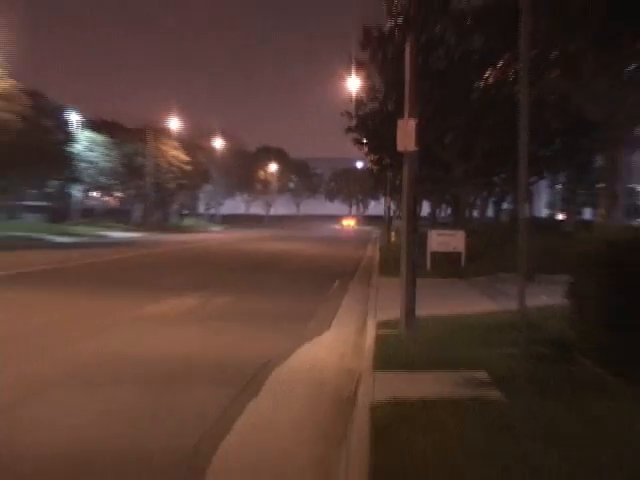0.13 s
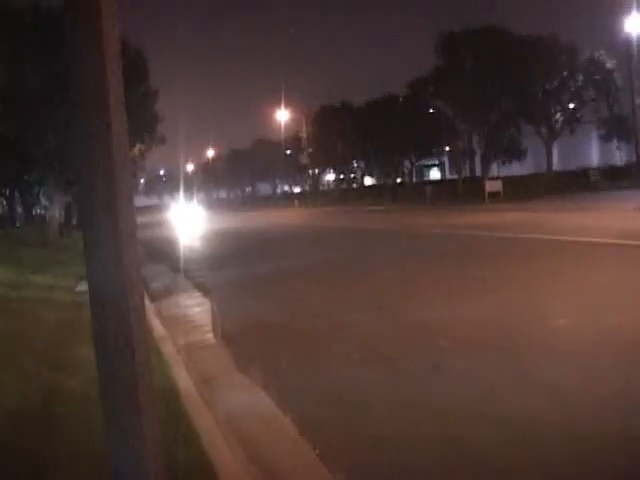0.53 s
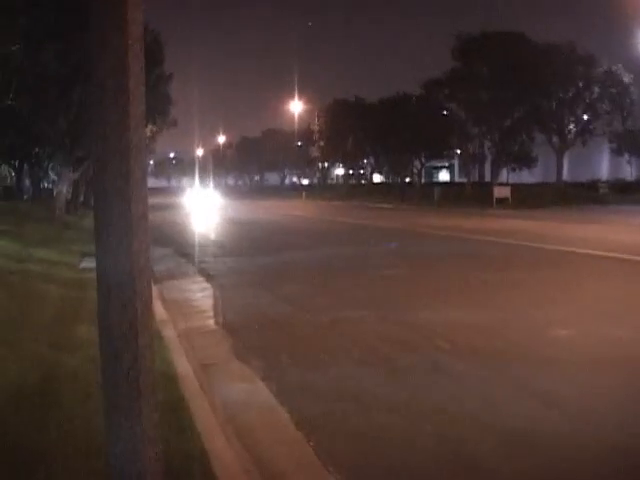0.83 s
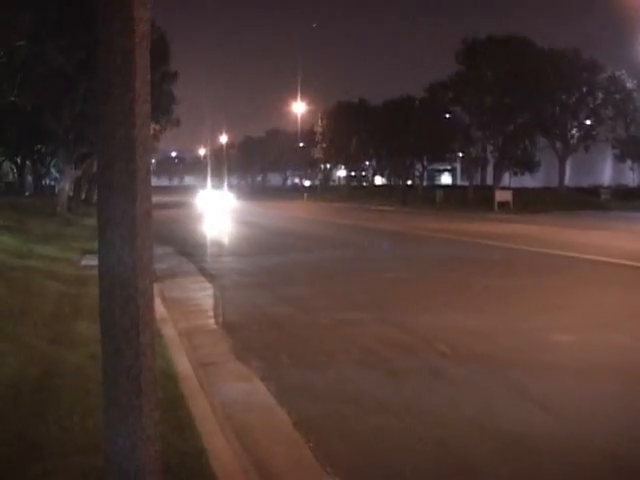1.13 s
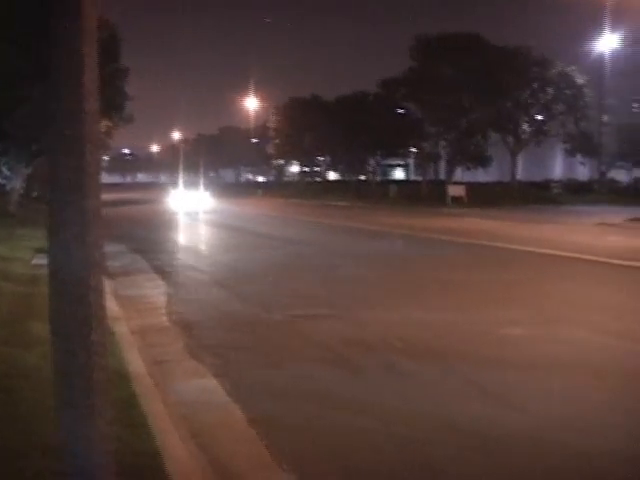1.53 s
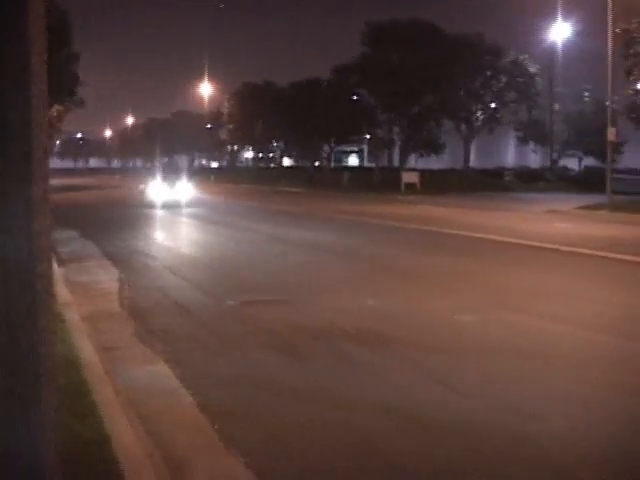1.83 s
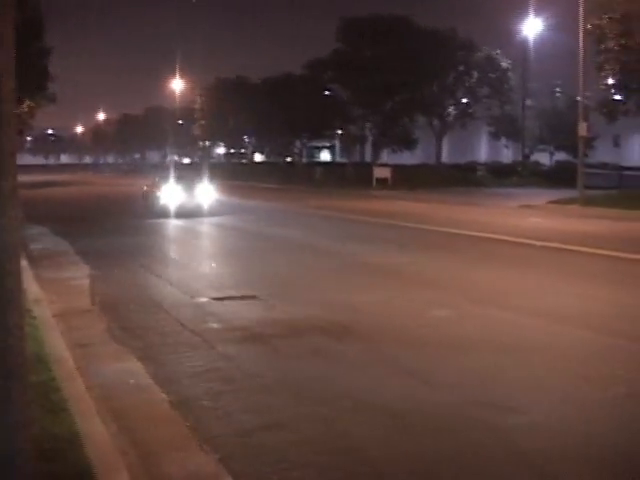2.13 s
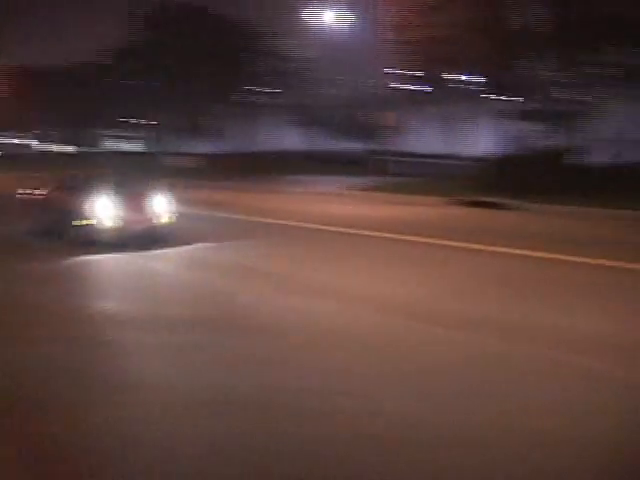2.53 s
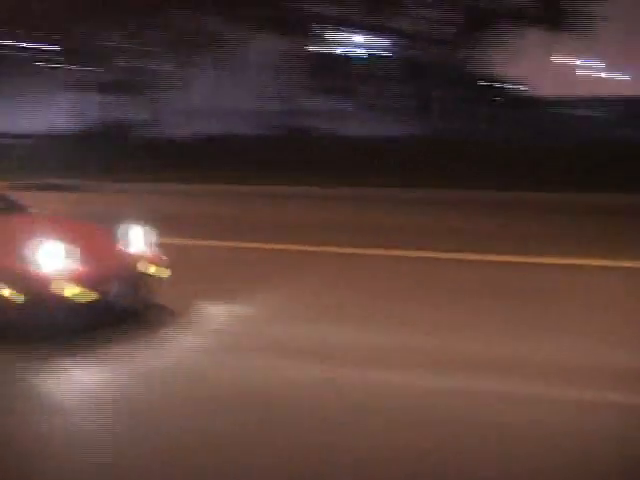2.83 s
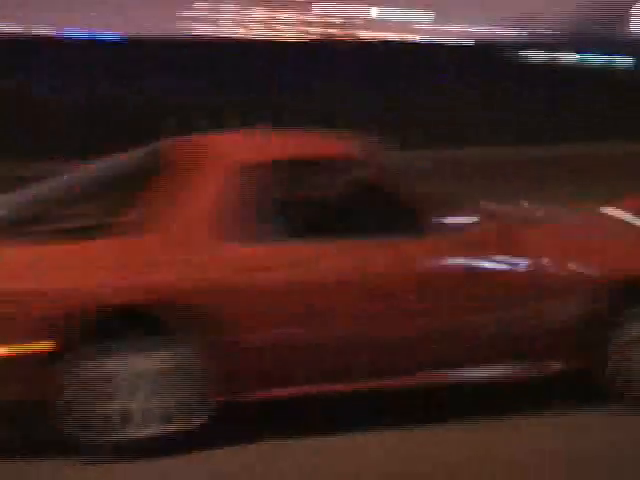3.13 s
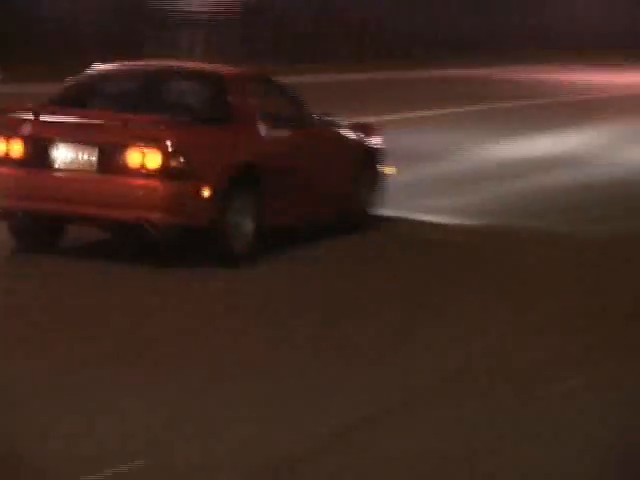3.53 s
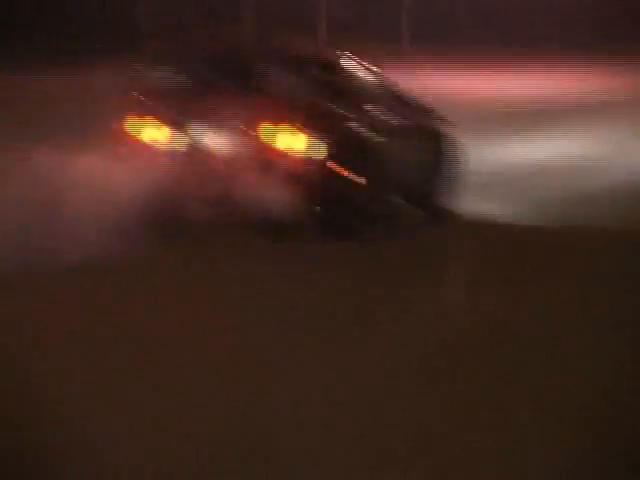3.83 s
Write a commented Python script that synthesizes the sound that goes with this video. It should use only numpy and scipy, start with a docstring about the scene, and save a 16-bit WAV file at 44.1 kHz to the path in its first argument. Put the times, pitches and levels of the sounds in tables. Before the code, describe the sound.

Sports car engine approaching loudly, throttle lifted, then popping and backfiring hard as it passes.

```python
"""A roadside at night: far traffic on a quiet street, then an abrupt cut to a sports car nearing the microphone.
The engine is a stack of shaft orders with gas rasp; tyres are coloured noise with wavering tones.
The driver lifts off just before passing: the note sinks and unburnt fuel pops as ringing tailpipe modes.
Two hard backfires, held bursts of noise, overload the microphone and echo along the street."""
import sys
import numpy as np
from scipy import signal
from scipy.fft import rfft, irfft, next_fast_len
from scipy.io import wavfile
from scipy.ndimage import uniform_filter1d, map_coordinates

SR = 44100
rng = np.random.default_rng(int(sys.argv[2]) if len(sys.argv) > 2 else 0)


def transcribe(signal):
    """Save signal, clipped to [-1, 1], as a 16-bit WAV file at the path in sys.argv[1]."""
    frames = np.atleast_2d(signal).T
    limited = np.clip(frames, -1, 1)
    pcm = np.round(limited * 32767).astype(np.int16)
    wavfile.write(sys.argv[1], SR, pcm)


N = 176400
CUT_S, LIFT_S = 0.594, 2.558  # the cut from traffic to car; the throttle closes


def amp(db):
    """Decibels to gain."""
    return 10 ** (np.asarray(db) / 20)


def unit(x):
    """Scale to rms 1."""
    return x / np.sqrt(np.mean(x ** 2) + 1e-20)


def clock():
    """Time of each sample in seconds."""
    return np.arange(N) / SR


def curve(rows):
    """(s, value) points joined by straight lines."""
    return np.interp(clock(), *np.transpose(rows))


def wobble(rate):
    """A smooth random curve, rate knots a second."""
    return map_coordinates(rng.standard_normal(int(N * rate / SR) + 4), [clock() * rate])


def filtered(x, response):
    """x times a response of frequency."""
    m = next_fast_len(N + SR)
    return irfft(rfft(x, m) * response(np.fft.rfftfreq(m, 1 / SR)), m)[:N]


def noise(colour):
    """Noise of rms 1 with a (Hz, dB) spectrum."""
    hz, db = np.transpose(colour)
    response = lambda f: amp(np.interp(np.log(f + 1), np.log(hz), db))
    return unit(filtered(rng.standard_normal(N), response))


def decay(age, t60):
    """Silence until age 0, then an exponential fall of 60 dB in t60 seconds."""
    return (age >= 0) * amp(-60 * np.maximum(age, 0) / t60)


def bell(offset, width):
    """A smooth bump of height 1, down to 1/e at width either side."""
    return np.exp(-(offset / width) ** 2)


def puffs(colour, angle, pulsing):
    """Gas noise of rms 1 that comes in one puff per turn of the angle."""
    return unit(noise(colour) * np.exp(pulsing * np.cos(angle)))


# spectrum of the far road: pitch_hz, level_db
TRAFFIC_COLOUR = [(40, -38), (140, -8.5), (300, -11), (520, -9.5), (950, 1), (1860, -12), (3650, -28.5),
                  (7200, -40.5), (10000, -39), (11000, -30), (12100, -45), (13300, -30), (15500, -46)]
TRAFFIC_DB = -42
FAR_ENGINE_HZ, FAR_ENGINE_DB = 239, -55


def traffic():
    """Far road noise and one humming engine, both gently unsteady in level."""
    hum = np.sqrt(2) * np.sin(2 * np.pi * FAR_ENGINE_HZ * clock() + 0.2 * wobble(10))
    road = amp(TRAFFIC_DB + 0.74 * wobble(22.3)) * noise(TRAFFIC_COLOUR)
    return road + amp(FAR_ENGINE_DB + wobble(6.2)) * hum


# engine speed as heard at the microphone: time_s, turns_per_s
SHAFT = [(.594, 114.5), (1, 118.4), (1.4, 122.4), (2, 128.1), (2.3, 130.7), (2.59, 132.9), (2.62, 125.5),
         (2.68, 123.6), (2.95, 126), (3.1, 122), (3.26, 120), (3.4, 111.5), (3.6, 109), (4, 105.5)]
JITTER = 0.0012  # unsteadiness of speed (share)


def shaft_angle():
    """Angle of the slightly unsteady engine shaft, the running sum of its speed."""
    return 2 * np.pi * np.cumsum(curve(SHAFT) * (1 + JITTER * wobble(29.63))) / SR


# reference level of the engine under load: time_s, level_db
DRONE = [(.6, -30), (1, -27), (1.45, -23), (1.9, -19.5), (2.2, -16), (2.4, -13.5), (2.55, -12.5)]
# first twelve multiples of shaft speed, against the drone, at three distances: level_db
ORDERS_FAR = [-30, 2.3, -12, -4.5, -13, -11, -18, -10, -9, -1, -16, -14]
ORDERS_MID = [-29, -.6, -20, -13, -8, -16, -10, -11, -9, -3.5, -16, -15]
ORDERS_NEAR = [-27, 1.4, -22, -8, -7.5, -9, -24, -12.5, -16, -16, -27, -24]
# when the far, halfway and near levels hold: time_s
ORDER_TIMES = [0.9, 1.53, 2.35]
# bands of orders that swell and fade: time_s, half_length_s, pitch_hz, half_width_hz, lift_db
SWELLS = [(1.92, .18, 4060, 130, 15), (1.75, .25, 3770, 70, 13), (1.45, .18, 4080, 110, 13),
          (1.8, .35, 2270, 70, 11), (2.22, .22, 2090, 60, 13), (2.17, .3, 2850, 60, 11),
          (2.54, .09, 1280, 160, 7), (2.61, .1, 640, 70, 5.5), (1.7, .2, 2640, 60, 8)]
# spectrum of the gas noise at each firing: pitch_hz, level_db
RASP_COLOUR = [(150, -28), (300, -17), (600, 3), (1150, -6.5), (1600, -6), (2300, 7), (3300, -37),
               (4100, -20), (7000, -22), (15000, -16.5)]
RASP_DB, RASP_PULSING = -13, 0.44  # against the drone; how sharply it pulses
OVERTONE_DB = -0.5  # trim of orders 1 and 3 to 12
UPPER_DB, UPPER_DB_PER_OCTAVE, UPPER_NEAR_DB = -19, -9.5, -3  # above the twelfth: level, slope, change near
FLUTTER_DB, FLUTTER_RATE = 1.8, 18  # unsteadiness of overtones (dB, knots a second)
FIRING_FALL_S, OVERTONE_FALL_S = 0.017, 0.017  # time constants of the fall after the lift
RINGING_ORDER, RINGING_FALL_S = 5, 0.1  # the order that the tailpipe holds after the lift


def drone(angle, count=40):
    """The engine under load: two firings a turn, overtones that flutter with the ground reflection, and rasp."""
    t = clock()
    speed = curve(SHAFT)
    coast = np.maximum(t - LIFT_S, 0)
    fading = np.exp(-coast / OVERTONE_FALL_S)

    def overtone_db(k):
        swell = sum(lift * bell(t - s, length) * bell(k * speed - hz, width)
                    for s, length, hz, width, lift in SWELLS)
        return swell + FLUTTER_DB * wobble(FLUTTER_RATE)

    firing, overtones = np.zeros(N), np.zeros(N)
    for k, levels in enumerate(zip(ORDERS_FAR, ORDERS_MID, ORDERS_NEAR), 1):
        partial = amp(np.interp(t, ORDER_TIMES, levels)) * np.sin(k * angle + rng.uniform(0, 2 * np.pi))
        if k == 2:
            firing += amp(0.45 * wobble(16)) * partial
        else:
            fall = RINGING_FALL_S if k == RINGING_ORDER else OVERTONE_FALL_S
            overtones += amp(OVERTONE_DB + overtone_db(k)) * partial * np.exp(-coast / fall)

    top = len(ORDERS_FAR)
    for k in range(top + 1, count):
        db = UPPER_DB + UPPER_DB_PER_OCTAVE * np.log2(k / top) + overtone_db(k)
        db += UPPER_NEAR_DB * np.interp(t, ORDER_TIMES, [0, 0, 1])
        phase = k * angle + rng.uniform(0, 2 * np.pi) + 0.5 * wobble(25)
        overtones += amp(db) * np.sin(phase) * fading

    rasp = amp(RASP_DB) * puffs(RASP_COLOUR, 2 * angle, RASP_PULSING) * fading
    tones = np.sqrt(2) * (firing * np.exp(-coast / FIRING_FALL_S) + overtones)
    return amp(curve(DRONE)) * (tones + rasp)


# level of the tyre roar at the microphone: time_s, level_db
ROAR = [(.6, -31.5), (1.1, -27), (1.6, -25.5), (2, -21), (2.3, -19.5), (2.55, -15.5), (2.68, -15.5),
        (2.9, -12.5), (3.06, -10.5), (3.28, -15), (3.45, -14), (3.65, -17.5), (3.85, -20), (4, -21)]
# level of the treble hiss: time_s, level_db
HISS = [(.6, -46.5), (1.1, -40.5), (1.6, -34.5), (2.1, -35.5), (2.5, -32.5), (2.72, -30), (2.92, -25.5),
        (3.07, -21), (3.28, -20), (3.45, -25), (3.65, -30), (4, -39)]
# roar spectra, car facing the microphone and then tail on: pitch_hz, level_db
ROAR_FRONT = [(35, -74), (60, -58), (91, -28), (123, -20), (194, -9), (301, -1.5), (353, -3.5), (382, -4),
              (414, -2), (505, -0.5), (655, -3.5), (1030, 3), (3160, -14.5), (3420, -21.5), (4700, -28.5),
              (7000, -55), (9100, -44), (15400, -120)]
ROAR_REAR = [(35, -69), (60, -47), (97, -15), (183, -12.5), (210, -16), (247, -8), (320, -2), (390, -9),
             (431, 4), (486, -4), (604, -4.5), (1140, -0.5), (1420, -4.5), (6210, -31), (7000, -50),
             (9100, -64), (15400, -120)]
# hiss spectra, on the approach and then close by: pitch_hz, level_db
HISS_FRONT = [(1500, -29), (2700, 8), (3400, 1.5), (4100, 10), (5300, -1), (6000, 3.5), (7000, -9),
              (8000, -5), (8600, -11.5), (10000, -3), (10500, -10), (10900, 0.5), (11600, -11),
              (12100, -18), (12700, -9), (13300, -2), (13700, -5), (14300, -6), (15800, -18)]
HISS_CLOSE = [(1500, -5.5), (2700, 9), (3500, 0.5), (4500, 6), (5300, -3), (6100, 1), (7300, -8.5),
              (9000, -9.5), (11000, -6), (12200, -10), (13300, -6), (15800, -12)]
# the car begins and ends turning its tail to the microphone: time_s
TURN_S = [2.98, 3.47]


def after_lift():
    """Share that rises from 0 at the lift to 1 as the car begins to turn its tail."""
    return np.interp(clock(), [LIFT_S, TURN_S[0]], [0, 1])


def tyres():
    """Road roar changes colour from front to rear; hiss peaks alongside."""
    rear = np.interp(clock(), TURN_S, [0, 1])
    close = after_lift()
    # square roots keep the power even through each crossfade
    roar = np.sqrt(1 - rear) * noise(ROAR_FRONT) + np.sqrt(rear) * noise(ROAR_REAR)
    hiss = np.sqrt(1 - close) * noise(HISS_FRONT) + np.sqrt(close) * noise(HISS_CLOSE)
    return amp(curve(ROAR) + 0.8 * wobble(45)) * roar + amp(curve(HISS) + 0.9 * wobble(60)) * hiss


# thin hissing tones during the approach: pitch_hz, peak_level_db
TREBLE_TONES = [(10900, -58), (13300, -57)]
TREBLE_FADE_S = 2.0  # the fade starts here and ends at the lift


def treble_tones():
    """Two faint tones high above the engine, made fuzzy by fast phase wander."""
    t = clock()
    tones = sum(amp(db) * np.sin(2 * np.pi * hz * t + 1.3 * wobble(250)) for hz, db in TREBLE_TONES)
    return tones * np.interp(t, [TREBLE_FADE_S, LIFT_S], [1, 0])


# spectrum of air on the microphone: pitch_hz, level_db
RUMBLE_COLOUR = [(15, -2), (30, -13), (60, -4), (120, -14), (400, -70)]
RUMBLE_DB = -74


def air():
    """Very faint low rumble of air on the microphone, unsteady in level."""
    return amp(RUMBLE_DB + 2 * wobble(4)) * noise(RUMBLE_COLOUR)


# level of the engine on a closed throttle: time_s, level_db
OVERRUN = [(2.5, -37), (2.66, -37), (3, -30.5), (3.25, -24), (3.4, -27), (3.65, -33), (4, -36)]
# its low orders, against that level: shaft_multiple, level_db
OVERRUN_ORDERS = [(1, -3.5), (2, -3.5), (3, -3), (4, -4), (5, -7.5)]
# spectrum of the exhaust puffs, one a turn: pitch_hz, level_db
CHUFF_COLOUR = [(120, -43), (280, 1), (1500, 0), (15000, -28)]
CHUFF_DB, CHUFF_PULSING = 1, 1.1  # against the closed-throttle level; how sharply they pulse
# level of the order that meets the tailpipe's resonance: time_s, level_db
PIPE_SING = [(3.3, -45), (3.45, -34), (3.69, -29.5), (3.73, -28), (3.79, -22), (3.87, -45), (4, -16)]
PIPE_ORDER, OVERRUN_RISE_S = 4, 0.017


def overrun(angle):
    """The coasting engine burbles on its low orders, chuffs once a turn and sings in the tailpipe."""
    burble = sum(amp(db + 2.9 * wobble(21.77)) * np.sin(k * angle + 0.18 * k * wobble(25))
                 for k, db in OVERRUN_ORDERS)
    chuff = amp(CHUFF_DB) * puffs(CHUFF_COLOUR, angle, CHUFF_PULSING)
    sing = amp(curve(PIPE_SING)) * np.sin(PIPE_ORDER * angle + 0.5 * wobble(25))
    engine = amp(curve(OVERRUN)) * (np.sqrt(2) * burble + chuff) + np.sqrt(2) * sing
    return engine * np.clip((clock() - LIFT_S) / OVERRUN_RISE_S, 0, 1)


# Doppler shift as the car goes by: time_s, pitch_ratio
DOPPLER = [(2.85, 1.06), (3.05, 1.035), (3.16, .99), (3.27, .96), (3.5, .935)]


def passing(hz):
    """Phase of a tone on the car, lowered by the Doppler shift as it goes by."""
    return 2 * np.pi * hz * np.cumsum(curve(DOPPLER)) / SR


# tones of the tyre tread before the Doppler shift: pitch_hz
TREAD_HZ = [891, 1164, 1318, 1435, 1574, 2063, 3020]
TREAD_DB, TREAD_DB_PER_OCTAVE = -21, -11  # lowest tone against the roar; slope above it
# the strongest tone in the roar, as heard: time_s, pitch_hz
HOWL = [(2.8, 1040), (3.02, 1050), (3.09, 950), (3.2, 935), (3.27, 1020), (3.42, 1120), (3.53, 1160),
        (3.65, 1030), (3.8, 1020), (3.92, 945)]
HOWL_DB = -11  # against the roar


def tread():
    """Wavering tyre tones emerge from the roar off load; the strongest dips in pitch alongside."""
    tones = np.zeros(N)
    for hz in TREAD_HZ:
        db = TREAD_DB + TREAD_DB_PER_OCTAVE * np.log2(hz / TREAD_HZ[0]) + 3.6 * wobble(12)
        tones += amp(db) * np.sin(passing(hz) + 1.2 * wobble(35))
    howl_phase = 2 * np.pi * np.cumsum(curve(HOWL)) / SR + 0.8 * wobble(70)
    howl = amp(HOWL_DB + 2 * wobble(40)) * np.sin(howl_phase)
    return amp(curve(ROAR)) * np.sqrt(2) * (tones + howl) * after_lift()


WHISTLE_HZ, WHISTLE_DB = 13000, -36.5  # before the Doppler shift; peak level
WHISTLE_S, WHISTLE_WIDTH_S = 3.15, 0.17  # centre; half length


def whistle():
    """A thin, fuzzy whistle swells and fades as the car is alongside the microphone."""
    tone = np.sin(passing(WHISTLE_HZ) + 0.8 * wobble(300))
    return amp(WHISTLE_DB) * tone * bell(clock() - WHISTLE_S, WHISTLE_WIDTH_S)


# soft pops in the exhaust: start_s, level_db, pitch_ratio
POPS = [(3.0211, -0.5, 0.86), (3.0443, 3, .92), (3.049, -2, 0.95), (3.310, -1, 1), (3.557, -4.5, 0.97),
        (3.578, -2, 0.8), (3.762, -2, 0.948), (3.7687, 6.5, .92), (3.7778, 0, .94), (3.9785, -2.5, 1.01),
        (3.9849, 2.5, 1.12), (3.994, -0.5, 0.93)]
# tailpipe modes at pitch ratio 1: pitch_hz, level_db, t60_s
PIPE = [(354, -11.5, 0.06), (443, -13.5, .06), (537, 3, 0.027), (630, -10.5, 0.017), (1122, -8, 0.024)]
PIPE_SCATTER = 0.013  # spread of the modes from pop to pop (share)
# spectrum of the spat gas: pitch_hz, level_db
SPIT_COLOUR = [(200, 3.5), (1500, 0), (4000, -6.5), (7000, -20), (12000, -16.5), (16000, -20)]
SPIT_DB, SPIT_T60, POP_LOW_HZ = -14.5, 0.036, 222  # against the pop; s; bass cut of the pops


def pops():
    """Small ignitions ring the tailpipe, each at its own pitch, and spit gas."""
    out, gas = np.zeros(N), noise(SPIT_COLOUR)
    for s, db, pitch in POPS:
        age = clock() - s
        ring = np.zeros(N)
        for hz, level, t60 in PIPE:
            mode_hz = hz * pitch * rng.normal(1, PIPE_SCATTER)
            ring += amp(level) * decay(age, t60) * np.sin(2 * np.pi * mode_hz * age)
        spit = amp(SPIT_DB) * gas * decay(age, SPIT_T60)
        out += amp(db) * (spit - ring)
    return signal.sosfilt(signal.butter(2, POP_LOW_HZ, 'high', fs=SR, output='sos'), out)


# spectrum of the echo: pitch_hz, level_db
STREET_COLOUR = [(100, -19), (450, -6), (1000, -1.5), (3000, -7), (12000, -3)]
STREET_DB, STREET_T60, STREET_DELAY_S = -14.5, 0.2, 0.012


def street(x):
    """Diffuse echo from trees and house fronts: a decaying noise tail convolved with the sound."""
    tail = noise(STREET_COLOUR) * decay(clock() - STREET_DELAY_S, STREET_T60)
    return amp(STREET_DB) * signal.fftconvolve(x, tail / np.linalg.norm(tail))[:N]


# sharp backfires: start_s, level_db, hold_s, pressure_surge (0-1)
BANGS = [(3.062, -6.5, .002, 0), (3.3137, 11, 0.0074, 1), (3.438, -15, .002, 0.07),
         (3.5613, 7.5, 0.0021, 0.78), (3.703, -19, 0.00092, 0.08)]
# spectrum of the bursts: pitch_hz, level_db
BANG_COLOUR = [(60, 3), (200, -6), (500, 3.5), (1200, -5), (3000, -3), (6000, -15.5), (11000, -22),
               (16000, -28)]
BANG_ATTACK_S, BANG_T60 = 0.0051, 0.046


def bangs():
    """Explosions at the pipe's mouth: a burst that holds briefly and dies."""
    t, envelope = clock(), np.zeros(N)
    for s, db, hold, _ in BANGS:
        attack = np.clip((t - s) / BANG_ATTACK_S, 0, 1)
        # the fall may begin during the attack when the hold is short
        envelope += amp(db) * attack * decay(np.maximum(t - s - hold, 0), BANG_T60)
    return envelope * noise(BANG_COLOUR)


SUCTION, SUCTION_S, SUCTION_DELAY_S = 0.52, 0.014, 0.012  # size, half width, lag
REBOUND, REBOUND_S, REBOUND_DELAY_S = 0.076, 0.036, 0.061  # the slower swing back


def surge():
    """The suction wave that follows each bang, by its pressure surge, and the rebound."""
    t, pressure = clock(), np.zeros(N)
    for s, _, _, size in BANGS:
        suction = SUCTION * bell(t - s - SUCTION_DELAY_S, SUCTION_S)
        rebound = REBOUND * bell(t - s - REBOUND_DELAY_S, REBOUND_S)
        pressure += size * (rebound - suction)
    return pressure


# bright ticks: start_s, level_db
TICKS = [(3.3745, -20), (3.6435, -29), (3.849, -27), (3.8586, -27), (3.9055, -30)]
# their spectrum: pitch_hz, level_db
TICK_COLOUR = [(5000, -25), (12000, 0), (16000, -9)]
TICK_T60 = 0.009  # s


def ticks():
    """Tiny bright ticks from the departing car, short decays of treble noise."""
    return noise(TICK_COLOUR) * sum(amp(db) * decay(clock() - s, TICK_T60) for s, db in TICKS)


def scene():
    """The quiet street with far traffic, then the passing car."""
    angle = shaft_angle()
    engine = drone(angle) + overrun(angle) + whistle()
    road = tyres() + tread() + treble_tones()
    shots = pops() + bangs()
    car = engine + road + ticks() + shots + street(shots)
    return np.where(clock() < CUT_S, traffic(), car + air())[None]


CLIP_TOP, CLIP_KNEE = 1.0, 8  # ceiling; higher is a narrower knee


def overload(x):
    """Clipping with a narrow knee."""
    return x / (1 + np.abs(x / CLIP_TOP) ** CLIP_KNEE) ** (1 / CLIP_KNEE)


COUPLING_HZ, TOP_HZ = 2.7, 15820  # bass roll-off of the surge; the microphone's band limit
SURGE_GROWS = 1.5  # the harder the microphone is driven, the further it is pushed off centre


def record(dry):
    """The microphone is pushed off centre by each surge, clips, and keeps nothing above its band limit."""
    x = dry[0]
    swing = filtered(surge(), lambda f: 1j * f / (COUPLING_HZ + 1j * f))
    drive = np.sqrt(np.abs(uniform_filter1d(x ** 2, size=220)))  # rms over 5 ms
    push = swing * (1 + SURGE_GROWS * drive)
    return filtered(overload(x + push), lambda f: f < TOP_HZ)[None]


dry = scene()
out = record(dry)
transcribe(out)
```